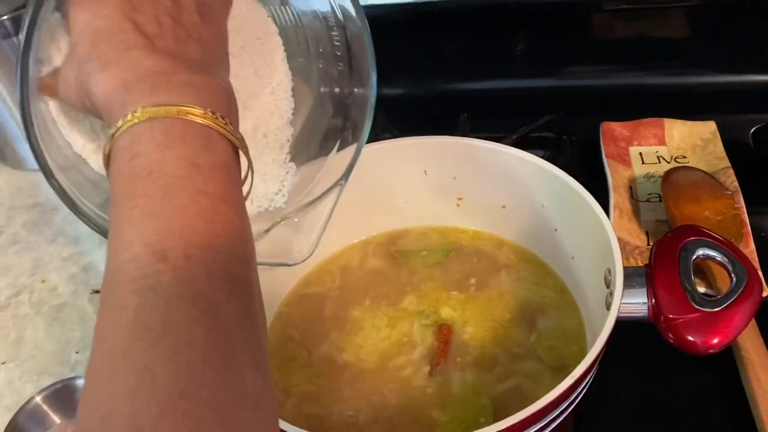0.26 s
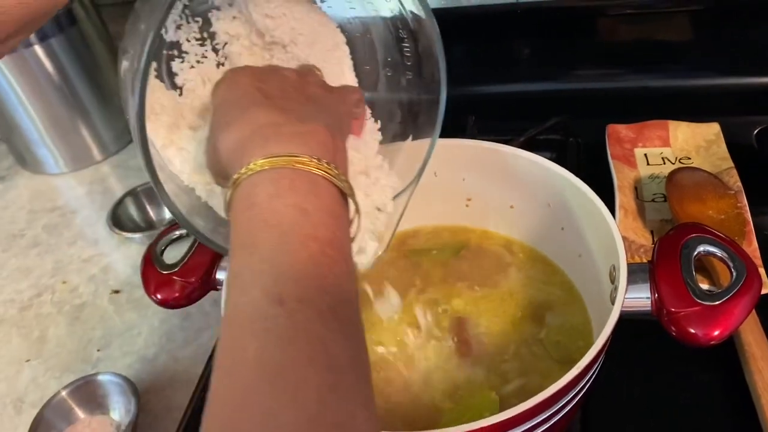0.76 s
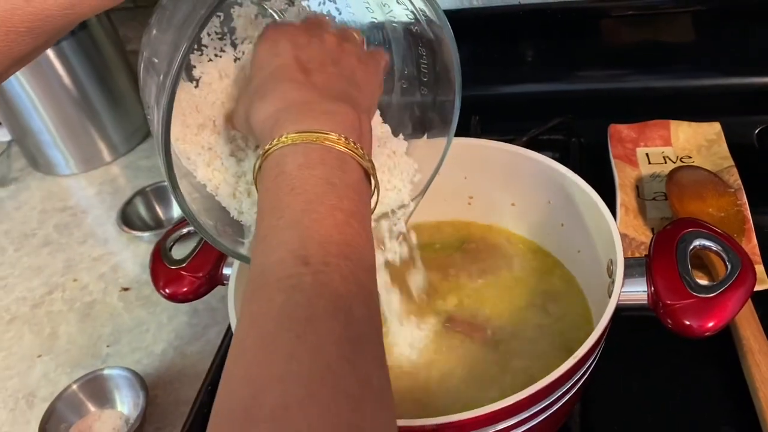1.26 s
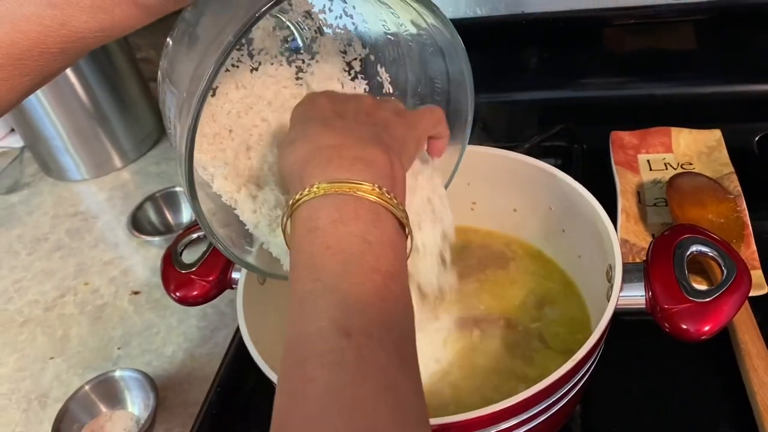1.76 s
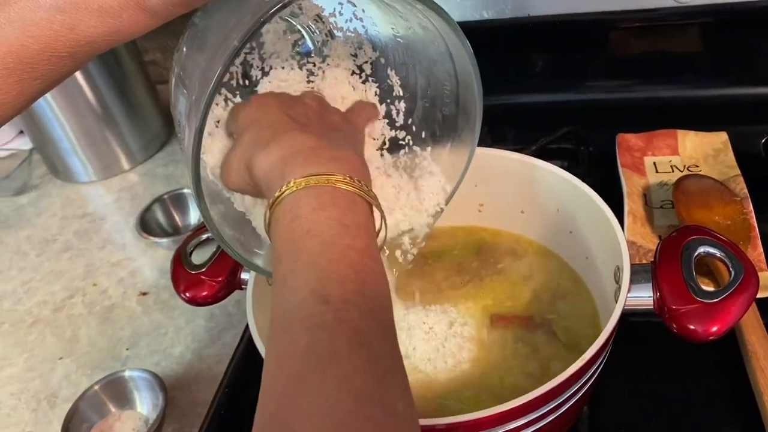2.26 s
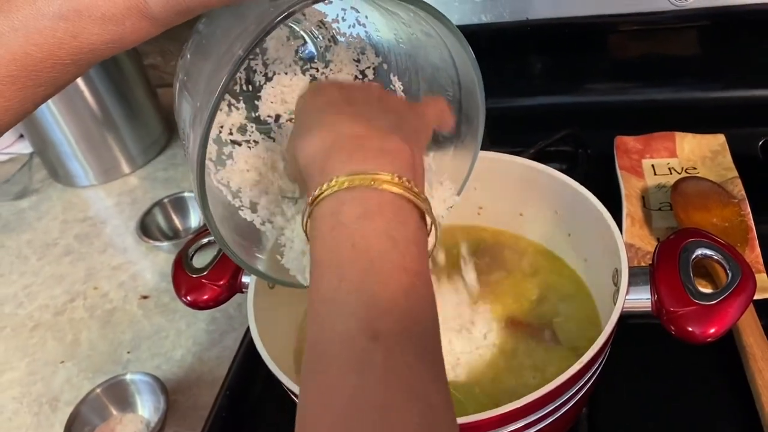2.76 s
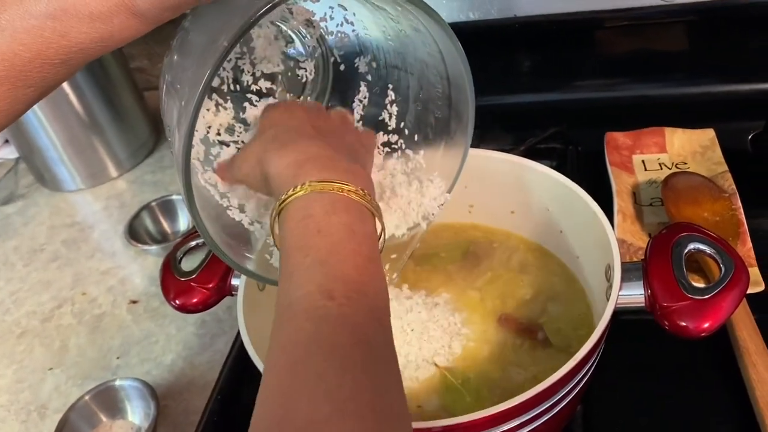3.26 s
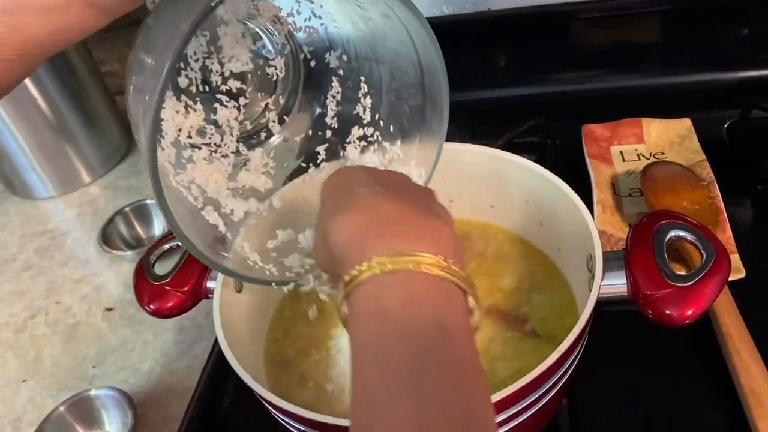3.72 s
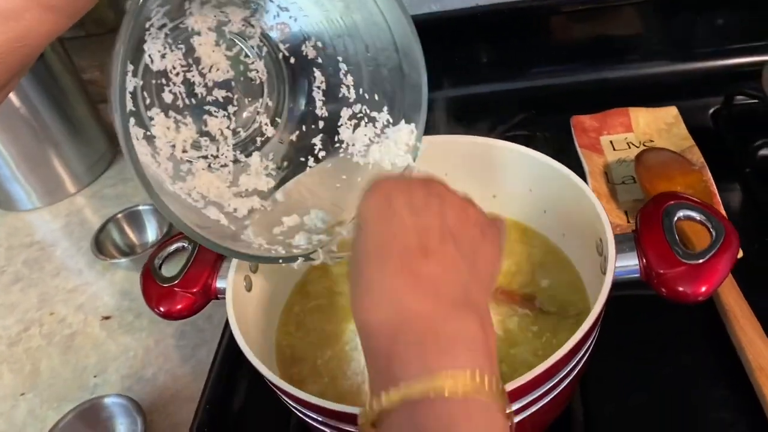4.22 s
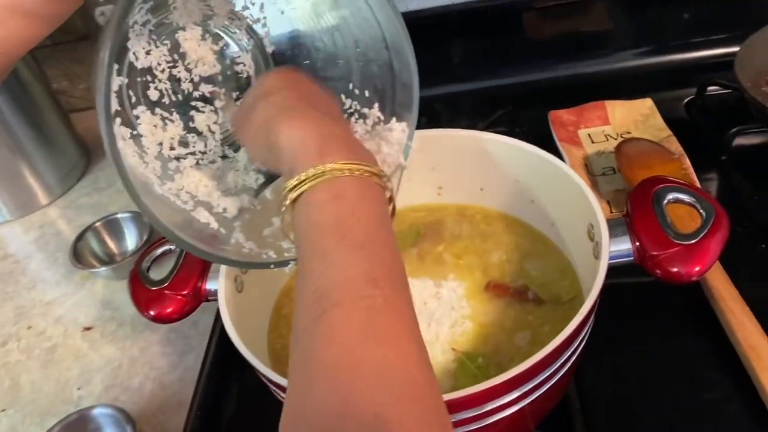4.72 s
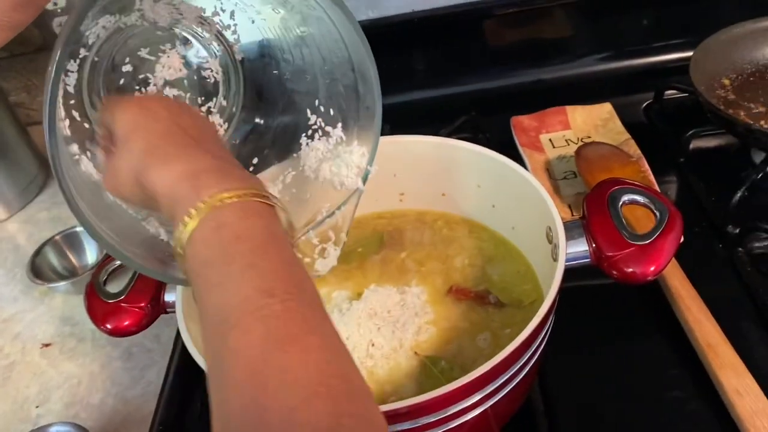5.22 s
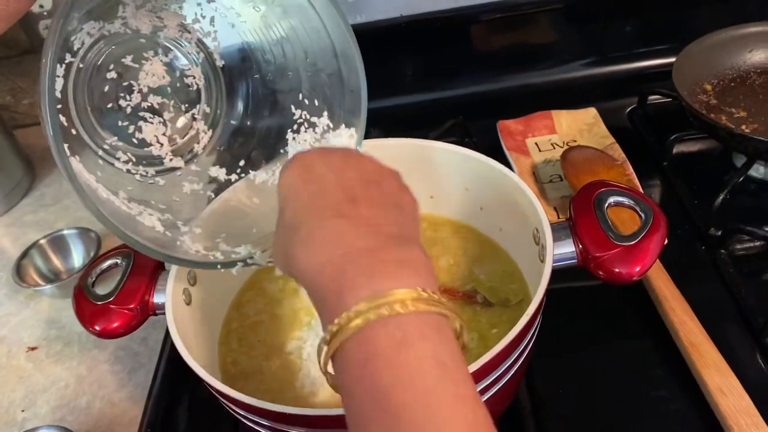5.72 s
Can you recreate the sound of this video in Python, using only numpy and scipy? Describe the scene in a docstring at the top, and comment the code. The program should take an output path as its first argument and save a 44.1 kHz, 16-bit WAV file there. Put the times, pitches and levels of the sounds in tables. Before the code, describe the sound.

Close-up stereo sound at a stove: a quiet low fan hum, a hollow ringing knock of bowl against pot at half a second, then bright, sizzling pours of wet grains into broth, strongest between one and two seconds, dotted with snapping bubbles. Later pushes are smaller and more separated, with finger rubs on glass and delicate bangles tinkling on a moving wrist toward the end.

```python
"""A kitchen stove: soaked rice is pushed by hand out of a glass bowl into a pot of simmering broth.
Wet grains crackle and splash in surges: showers of tiny ringing pops, with larger bursts and plinks.
The bowl knocks on the rim and rings the pot's modes; thin bangles jingle on the wrist in fading bounces.
A fan drones as coloured noise with wavering tones; a close pair of microphone ports picks it all up."""
import sys
import numpy as np
from scipy import signal
from scipy.fft import rfft, irfft, next_fast_len
from scipy.io import wavfile

SR = 44100
rng = np.random.default_rng(int(sys.argv[2]) if len(sys.argv) > 2 else 0)


def generate_wav(signal):
    """Clip the signal to [-1, 1] and save it as 16-bit WAV at the path in sys.argv[1]."""
    frames = np.transpose(np.atleast_2d(signal))
    scaled = np.clip(frames, -1, 1) * 32767
    pcm = np.round(scaled).astype(np.int16)
    wavfile.write(sys.argv[1], SR, pcm)


N = 263894
TIME = np.arange(N) / SR
FFT_SIZE = next_fast_len(N, real=True)
BINS_HZ = np.arange(FFT_SIZE // 2 + 1) * SR / FFT_SIZE


def from_db(db):
    """Decibels to amplitude gain."""
    return 10 ** (np.asarray(db) / 20)


def rms_one(x):
    """Scale to rms 1."""
    return x / np.sqrt(np.mean(x ** 2) + 1e-20)


def coloured(x, spectrum):
    """Shape a flat sound with a spectrum interpolated over log frequency; rms 1."""
    hz, db = np.transpose(spectrum)
    gain = from_db(np.interp(np.log(BINS_HZ + 1), np.log(hz), db))
    return rms_one(irfft(rfft(x, FFT_SIZE) * gain, FFT_SIZE)[..., :N])


def cut(x, hz, kind, order=2):
    """Butterworth low-pass or high-pass."""
    sos = signal.butter(order, min(hz, 0.45 * SR), kind, fs=SR, output="sos")
    return signal.sosfilt(sos, x + 1e-18)


def drift(rate_hz):
    """Random curve of rms 1 that reaches a new value rate_hz times a second."""
    knots = rng.standard_normal(2000)
    return rms_one(np.interp(TIME * rate_hz, np.arange(len(knots)), knots))


def swell(rise_s, size):
    """Envelope that climbs to 1 at rise_s and fades."""
    age = TIME[:size] / rise_s
    return age ** 2 * np.exp(2 * (1 - age))


def burst(t60_s, size=6000):
    """Noise that dies away by 60 dB in t60_s."""
    return rng.standard_normal(size) * from_db(-60 * TIME[:size] / t60_s)


def ring(clicks, hz, t60_s):
    """Two-pole resonator: a unit click starts a decaying sine of height 1."""
    radius = from_db(-60 / (t60_s * SR))
    angle = 2 * np.pi * hz / SR
    return signal.lfilter([0, np.sin(angle)], [1, -2 * radius * np.cos(angle), radius ** 2], clicks + 1e-18)


def add(track, start_s, sound):
    """Mix a short sound into the track."""
    start = min(round(start_s * SR), N)
    track[start:start + len(sound)] += sound[:N - start]


def grains(per_s, spread_db, low_hz, high_hz, cycles, patchy_db=0, count=20):
    """Random tiny pops ring a few cycles at one of many pitches, clustered per pitch; flat per Hz."""
    born = np.flatnonzero(rng.random(N) < per_s / SR)
    size_db = spread_db * np.minimum(rng.exponential(1, len(born)), 5)
    sizes = from_db(size_db) * rng.choice([-1, 1], len(born))
    pitch_index = rng.integers(0, count, len(born))
    out = np.zeros(N)
    for k, hz in enumerate(np.geomspace(low_hz, high_hz, count)):
        chosen = pitch_index == k
        at = born[chosen]
        cluster = rng.standard_normal(N // 600 + 1)  # one value per 600 samples
        clicks = np.zeros(N)
        clicks[at] = sizes[chosen] * from_db(patchy_db * cluster[at // 600])
        pops = np.diff(ring(clicks, hz, cycles / hz), prepend=0)
        out += np.sqrt(hz) * rms_one(pops)
    return out


SURGE_DB = 21.5  # climb over the rise, and equal fall over the fall
SPRAY_FOLLOWS, SPLASH_FOLLOWS = 0.98, 0.67  # dB of spray and of splash per dB of surge
TRICKLE_DB, SIMMER_DB = -84.5, -79.5  # floors: stray grains, simmering broth
# Pushes of the hand. Each row: crest in seconds, crackle in dB before the mix, rise in seconds, fall in
# seconds, fine spray in dB over the crackle, splash in dB over the crackle.
PUSHES = [(0.29, -62.5, 0.63, 1, 4, -3), (0.644, -51.5, 0.054, 0.063, 9.5, -1),
          (0.998, -48, 0.19, 0.67, 0, -10), (1.657, -46, 0.23, 0.64, -2, -13),
          (2.06, -57, 0.23, 0.46, -23, -11), (2.572, -51, 0.35, 0.35, 3, -8.5),
          (2.842, -55, 0.78, 0.07, -4, -29), (3.081, -64.5, 0.2, 0.47, 0, -11.5),
          (3.6, -53, 0.33, 0.25, 1.5, -6), (4.11, -55, 0.034, 0.14, 5, 0.5),
          (4.508, -64, 0.17, 0.5, 2.5, 4), (5.0, -72, 0.374, 1, 6.5, -11.5),
          (5.618, -58.5, 0.19, 0.11, 8.5, -10)]


def surges():
    """Each push swells to a crest and drains away; powers add to give crackle, spray and splash in dB."""
    crackle, spray, splash = from_db([TRICKLE_DB, TRICKLE_DB, SIMMER_DB]) ** 2
    for crest_s, db, rise_s, fall_s, spray_db, splash_db in PUSHES:
        distance = np.maximum((crest_s - TIME) / rise_s, (TIME - crest_s) / fall_s)
        shape_db = -SURGE_DB * distance.clip(0, 8)
        crackle = crackle + from_db(db + shape_db) ** 2
        spray = spray + from_db(db + spray_db + SPRAY_FOLLOWS * shape_db) ** 2
        splash = splash + from_db(db + splash_db + SPLASH_FOLLOWS * shape_db) ** 2
    return 10 * np.log10([crackle, spray, splash])


# Crackle spectrum. Each row: frequency in Hz, relative level in dB per Hz.
CRACKLE_SPECTRUM = [(900, -22), (1800, -21), (2400, -7), (2850, -14), (3250, -11), (4200, -1.5),
                    (5200, 1.5), (6300, -2), (7800, -0.5), (11000, 1.5), (16000, 1.5)]


def rice(crackle_db, spray_db):
    """Wet grains part and land: stronger flow, denser crackle and denser squelch of tiny air pockets."""
    flow = 0.25 + 0.75 * from_db(0.5 * (crackle_db - crackle_db.max()))
    ticks = grains(12000 * flow, spread_db=3.2, low_hz=1390, high_hz=14800, cycles=6.0, patchy_db=2.5)
    pockets = grains(2000 * flow, spread_db=3.3, low_hz=2050, high_hz=8000, cycles=14.0, patchy_db=4.0)
    crackle = coloured(ticks, CRACKLE_SPECTRUM)
    squelch = from_db(-3) * rms_one(pockets)
    coarse = (cut(crackle, 10330, "low", order=4) + squelch) * from_db(crackle_db)
    fine = cut(crackle, 7770, "high", order=4) * from_db(spray_db)
    even = np.sqrt(flow.mean() / flow)  # density alone does not raise the level
    flicker = from_db(0.9 * drift(23) + 0.8 * drift(270))
    return (coarse + fine) * even * flicker


# Fingers sweep rice off the glass and clumps slap down. Each row: start in seconds, rms before the
# envelope and mix in dB, length in seconds, lowest Hz, highest Hz.
CLUMPS = [(0.171, -63, 0.088, 1100, 3900), (1.06, -49, 0.043, 9000, 16000), (1.794, -46, 0.042, 885, 7000),
          (2.03, -50, 0.055, 8900, 16000), (2.35, -61.5, 0.19, 900, 2800), (2.494, -53, 0.071, 2360, 6200),
          (2.59, -61, 0.025, 2400, 8500), (2.678, -54, 0.063, 2530, 6500), (2.805, -67, 0.039, 2520, 7600),
          (2.956, -57.5, 0.11, 4180, 15000), (3.054, -65, 0.05, 2500, 6500),
          (3.443, -54, 0.062, 3300, 6400), (3.56, -48, 0.031, 2050, 8660), (3.711, -56, 0.022, 4550, 8000),
          (3.753, -61, 0.1, 990, 3240), (4.107, -52, 0.019, 800, 9100), (4.503, -65, 0.041, 3000, 8000),
          (4.533, -56.5, 0.038, 2480, 5860), (4.549, -61.5, 0.065, 1320, 3200),
          (5.444, -64.5, 0.17, 4000, 7000), (5.598, -70, 0.062, 1980, 8150),
          (5.708, -57, 0.026, 5000, 12000)]


def clumps():
    """A clump is a short band-limited shower of coarse grains that swells quickly and fades."""
    shower = rms_one(grains(6000, spread_db=3.0, low_hz=695, high_hz=12000, cycles=4.0, patchy_db=3.0))
    out = np.zeros(N)
    for start_s, db, length_s, low_hz, high_hz in CLUMPS:
        shape = swell(length_s / 4, round(2 * length_s * SR))
        piece = np.roll(shower, -round(start_s * SR))[:len(shape)]
        piece = cut(piece, low_hz, "high", order=3)
        piece = cut(piece, high_hz, "low", order=3)
        add(out, start_s, from_db(db) * shape * rms_one(piece))
    return out


# Splash spectrum. Each row: frequency in Hz, relative level in dB per Hz.
SPLASH_SPECTRUM = [(300, 17.5), (600, -7), (1150, -7.5), (1700, -15.5), (2400, -18), (4000, -15)]


def broth(splash_db):
    """Sinking rice drags in small ringing bubbles, over a quiet simmer."""
    per_s = 450 * from_db(4.0 * drift(15))
    bubbles = grains(per_s, spread_db=3.0, low_hz=500, high_hz=3000, cycles=14.0, patchy_db=2.5)
    return coloured(bubbles, SPLASH_SPECTRUM) * from_db(splash_db)


SNAP_T60_S, SNAP_SHORTENS = 0.022, 0.15  # decay at 5 kHz; power of pitch that shortens it
SNAP_TOP_OVER_CENTRE = 2.5  # low-pass at this multiple of the centre
# Largest air pockets. Each row: start in seconds, peak (99.9th percentile) in dB, centre Hz, lowest Hz.
SNAPS = [(0.6112, -39, 11100, 6000), (0.647, -39, 8000, 2200), (0.7362, -41.5, 4200, 2200),
         (0.9216, -31, 11300, 5000), (0.9648, -29.5, 12100, 4000), (0.9817, -27.5, 8000, 2200),
         (1.3378, -38, 8000, 4000), (1.441, -29.5, 8000, 3400), (1.4771, -46, 12000, 8000),
         (1.539, -38, 12000, 8000), (1.5609, -38, 7000, 3200), (1.5859, -36.5, 11500, 8000),
         (1.641, -31, 7000, 2800), (1.7804, -25, 5500, 3600), (1.8334, -26.5, 7340, 2800),
         (2.1107, -37, 3600, 2900), (2.1541, -42, 10500, 7500), (2.189, -49, 12000, 8000),
         (2.3177, -48, 11500, 8000), (2.3499, -40, 6500, 4000), (2.5328, -33, 5040, 3200),
         (3.0431, -49, 7500, 3000), (3.1448, -50, 7500, 4000), (3.3434, -51, 8000, 5000),
         (4.2415, -48, 7000, 4000), (4.4235, -40, 12400, 9000), (5.104, -49, 12000, 8000)]


def snaps():
    """The largest air pockets burst: a sharp tick and a short noise spray round one pitch."""
    out = np.zeros(N)
    for start_s, db, hz, low_hz in SNAPS:
        t60_s = SNAP_T60_S * (5000 / hz) ** SNAP_SHORTENS
        spray = burst(t60_s) + 1.1 * burst(t60_s=0.004)
        spray = cut(spray, low_hz, "high", order=4)
        spray = cut(spray, SNAP_TOP_OVER_CENTRE * hz, "low", order=3)
        snap = rms_one(spray) + 0.6 * rms_one(ring(spray, hz, 7 / hz))
        add(out, start_s, from_db(db) * snap / np.percentile(np.abs(snap), 99.9))
    return out


SPIT_OVER_FLOW_DB, SPIT_SPREAD_DB = 8, 3  # small plinks: peak over the crackle level, plus or minus
PLINK_RISE_S, PLINK_CYCLES = 0.0025, 11  # opening time; cycles per 60 dB in each of two resonators
# Larger single bubbles. Each row: start in seconds, peak in dB, pitch in Hz.
PLINKS = [(1.7, -35, 5100), (1.8673, -37, 5270), (1.982, -39.5, 5460), (2.0329, -47, 3000),
          (2.1676, -42, 4470), (2.2185, -44.5, 5700), (2.2434, -44.5, 6460), (2.551, -38, 2630),
          (2.6834, -62, 2760), (2.8087, -44.5, 4500), (3.4058, -49.5, 6960), (4.8466, -45.5, 7960),
          (5.112, -55.5, 3670), (5.684, -56.5, 4370)]


def plinks(crackle_db, count=24):
    """Bubbles part in the wet rice and ring at one pitch; small ones fall at random, mostly in strong flow."""
    passed = np.cumsum(from_db(crackle_db) ** 2)
    starts = np.searchsorted(passed, rng.random(count) * passed[-1])
    spit_db = crackle_db[starts] + SPIT_OVER_FLOW_DB + SPIT_SPREAD_DB * rng.uniform(-1, 1, count)
    spits = list(zip(starts / SR, spit_db, rng.uniform(3300, 8000, count)))
    out = np.zeros(N)
    for start_s, db, hz in spits + list(PLINKS):
        plink = swell(PLINK_RISE_S, size=2000) * rng.standard_normal(2000)
        for _ in range(2):
            plink = ring(plink, hz, PLINK_CYCLES / hz)
        add(out, start_s, from_db(db) * plink / np.abs(plink).max())
    return out


SWIPE_WIDTH_HZ, SWIPE_JERK_DB = 260, 4  # low-pass of the resonance noise; stick-slip level spread
# Wet finger drags on the glass. Each row: start in seconds, rms before the envelope and mix in dB,
# length in seconds, first Hz, last Hz.
SWIPES = [(4.535, -66, 0.07, 3000, 1100), (5.48, -66, 0.075, 4000, 5000), (5.59, -62, 0.05, 4100, 5600)]


def swipes():
    """The finger's jerky rubbing sounds in a narrow resonance that glides as the gap under it changes."""
    out = np.zeros(N)
    for start_s, db, length_s, first_hz, last_hz in SWIPES:
        size = round(2 * length_s * SR)
        phase = 2 * np.pi * np.cumsum(np.geomspace(first_hz, last_hz, size)) / SR
        a, b = cut(rng.standard_normal((2, SR)), SWIPE_WIDTH_HZ, "low")[:, :size]
        jerk = from_db(SWIPE_JERK_DB * drift(110)[:size])
        rub = (a * np.cos(phase) + b * np.sin(phase)) * jerk
        add(out, start_s, from_db(db) * swell(length_s / 2, size) * rms_one(rub))
    return out


CONTACT_RISE_S = 0.002
# Bowl meets rim. Each row: start in seconds, contact peak in dB, contact pitch in Hz, crack drive in dB
# over the peak before its filters, stove-top thud drive in dB over the peak.
KNOCKS = [(0.4685, -9.5, 1130, -16, 1.5), (0.509, -40, 1250, 5, -12), (0.5595, -21.5, 1100, -22, 6),
          (1.444, -44, 1380, -26, 1), (1.468, -40.5, 1330, -14, 2), (1.486, -48, 1340, -16, -10),
          (1.517, -36.5, 1250, -13, 6.5)]
# Bowl, pot and stove top together. Each row: mode in Hz, level in dB per unit blow, t60 in seconds.
POT_MODES = [(60, -27, 0.45), (98, -21, 0.16), (128, -24, 0.2), (166, -14, 0.15), (330, -21, 0.09),
             (372, -19, 0.15), (466, -19, 0.12), (507, -19, 0.13), (528, -21, 0.22), (610, -22, 0.07),
             (693, -26, 0.22), (724, -28.5, 0.22), (846, -31, 0.16), (1045, -14, 0.085), (1141, -18, 0.165),
             (1273, -21, 0.2), (1418, -28, 0.12), (1484, -30, 0.2), (1570, -22, 0.05), (1635, -26, 0.13),
             (1768, -32, 0.13), (1900, -27, 0.045), (2180, -29, 0.05), (2285, -33, 0.13), (2345, -31, 0.08),
             (2835, -31, 0.09), (2905, -33, 0.13), (3920, -30, 0.03), (4900, -32, 0.03)]


def knocks():
    """Glass on the rim: contact tone, short crack, ringing modes, faint chatter of the pot on the stove top."""
    blows, contacts, cracks, chatter, thuds = np.zeros((5, N))
    contact = swell(CONTACT_RISE_S, size=1000)
    for start_s, db, hz, crack_db, thud_db in KNOCKS:
        add(contacts, start_s, from_db(db) * contact * np.sin(2 * np.pi * hz * TIME[:len(contact)]))
        add(blows, start_s, from_db([db]))
        add(cracks, start_s, from_db(db + crack_db) * burst(t60_s=0.1))
        add(chatter, start_s, from_db(db) * burst(t60_s=0.13))
        add(thuds, start_s + 0.01175, from_db([db + thud_db]))  # heavy stove top answers after the rim
    body = np.zeros(N)
    for k, (hz, db, t60_s) in enumerate(POT_MODES):
        drive = thuds if hz < 250 else blows
        body += (-1) ** k * from_db(db) * ring(drive, hz, t60_s)
    crack = cut(cut(cracks, 1150, "high"), 4140, "low", order=1)
    rattle = from_db(-6) * cut(cut(chatter, 230, "high"), 620, "low", order=1)
    return contacts + body + crack + rattle


BUMP_CYCLES = 2.8  # cycles until loudest
# Pot rocks back onto the stove top. Each row: start in seconds, peak in dB, pitch in Hz.
BUMPS = [(0.556, -34.5, 500), (0.617, -43, 60.5)]


def bumps():
    """The pot settles: each soft landing hums briefly at one pitch."""
    out = np.zeros(N)
    for start_s, db, hz in BUMPS:
        push = swell(BUMP_CYCLES / hz, size=8000)
        add(out, start_s, from_db(db) * push * np.sin(2 * np.pi * hz * TIME[:len(push)]))
    return out


BOUNCE_S, BOUNCE_LOSS_DB = 0.008, 2.6  # mean gap; loss per bounce
BANGLE_DETUNE, BANGLE_DAMPING = 0.007, 0.7  # pitch difference; share of free t60 left in contact
LOW_RINGS_BELOW_HZ = 9500
# Touches, ringing less against the skin. Each row: start in seconds, contact noise gain in dB,
# high rings in dB, low rings in dB, both before the mode level and a common -7.5 dB.
JINGLES = [(3.999, -51, -67, -75), (4.108, -37, -62, -52.5), (4.2644, -54, -64, -78),
           (4.469, -48, -67, -53.5), (4.889, -57, -66, -66), (4.929, -59, -74, -70),
           (4.978, -57.5, -77, -66.5), (5.225, -50.5, -56, -70.5), (5.549, -47.5, -48, -71),
           (5.591, -50, -59, -58), (5.808, -59, -88, -74), (5.857, -58, -49, -74),
           (5.862, -53.5, -49.5, -71), (5.896, -56, -61, -74), (5.968, -57, -56.5, -76)]
# Bangle rings. Each row: frequency in Hz, relative level in dB, free t60 in seconds.
BANGLE_MODES = [(5712, -8, 0.16), (6072, -6, 0.17), (6570, -8, 0.17), (6875, -7, 0.16), (7127, -2, 0.22),
                (8576, 0, 0.07), (10520, -5, 0.12), (10960, -9, 0.14), (11370, -2, 0.09), (11490, 2, 0.16),
                (12060, -9, 0.12), (14770, -10, 0.1), (15030, -7, 0.12), (15590, -7, 0.13)]


def bangles(count=7):
    """Each touch is a run of uneven, fading bounces that tick and strike every ring; two unlike bangles beat."""
    touches_s, contact_db, high_db, low_db = np.transpose(JINGLES)
    gaps_s = BOUNCE_S * rng.uniform(0.3, 1.7, (len(touches_s), count))
    times_s = touches_s[:, None] + np.cumsum(gaps_s, axis=1) - gaps_s[:, :1]
    at = np.minimum((times_s * SR).astype(int), N - 1)
    fading = from_db(-BOUNCE_LOSS_DB * np.arange(count))
    out = np.zeros(N)
    for hz, db, t60_s in BANGLE_MODES:
        ring_db = low_db if hz < LOW_RINGS_BELOW_HZ else high_db
        for detune in (1 - BANGLE_DETUNE / 2, 1 + BANGLE_DETUNE / 2):
            luck_db = rng.normal(0, 3.5, at.shape)
            clicks = np.zeros(N)
            clicks[at] = fading * from_db(ring_db[:, None] + db + luck_db - 7.5)
            out += ring(clicks, hz * detune, BANGLE_DAMPING * t60_s)
    contact_gains = fading * from_db(contact_db[:, None])
    for start_s, gain in zip(times_s.ravel(), contact_gains.ravel()):
        tick = 1.05 * burst(t60_s=0.036) + 1.6 * burst(t60_s=0.006)
        add(out, start_s, gain * cut(tick, 8800, "high"))
    return out


def narrow_noise(hz, width_hz):
    """Resonance-shaped spectrum of a wavering tone, with the power of white noise."""
    return rms_one(1 / (1 + (2 * (BINS_HZ - hz) / width_hz) ** 2))


# Rush of the fan. Each row: frequency in Hz, relative level in dB per Hz.
FAN_SPECTRUM = [(15, -42), (25, -36), (43, -10), (76, -9), (128, -13), (164, -1.5), (202, -19.5),
                (264, -8.5), (434, -20), (471, -9.5), (501, -17), (932, -24.5), (1010, -25.5),
                (2310, -42.5), (3500, -47), (4550, -43), (7700, -120)]
# Motor and duct tones. Each row: frequency in Hz, width in Hz, level in dB before a common +4 dB.
FAN_TONES = [(61.8, 4.8, -70), (90.1, 3.7, -63), (116.4, 1.7, -66.5), (163.3, 28.4, -56), (267.1, 4.1, -66),
             (348, 92, -61), (2800, 200, -84.5)]
# Passing swells of the hum. Each row: crest in seconds, length in seconds, frequency in Hz,
# peak in dB before the same +4 dB.
HUM_SWELLS = [(2.75, 0.65, 274.5, -56.5), (4.98, 1.94, 478.4, -62.5)]


def fan():
    """A steady rush, independent noise on each side, with wavering motor and duct tones in it."""
    rush = from_db(-50.5) * coloured(rng.standard_normal((2, N)), FAN_SPECTRUM)
    lines = sum(from_db(db) * narrow_noise(hz, width_hz) for hz, width_hz, db in FAN_TONES)
    tones = irfft(lines * rfft(rng.standard_normal((2, FFT_SIZE))), FFT_SIZE)[:, :N]
    for crest_s, length_s, hz, db in HUM_SWELLS:
        shape = np.exp(-(2 * (TIME - crest_s) / length_s) ** 2)
        tones = tones + from_db(db) * shape * np.sin(2 * np.pi * hz * TIME + drift(12))
    return rush + from_db(4.0) * tones


def kitchen(x, t60_s, treble_t60_s, size=22000):
    """Dense reflections as decaying noise, different on each side; the treble dies sooner."""
    onset = 1 - np.exp(-TIME[:size] / 0.0006)
    sides = []
    for _ in range(2):
        low = cut(burst(t60_s, size), 3270, "low", order=1)
        treble = cut(burst(treble_t60_s, size), 1900, "high", order=1)
        response = rms_one(onset * (low + treble)) / np.sqrt(size)
        sides.append(signal.fftconvolve(x, response)[:N])
    return np.array(sides)


def turned(pair, lead_rad, spread):
    """Scale the side signal and let the left lead in phase, per frequency."""
    left, right = rfft(pair, FFT_SIZE)
    mid, side = (left + right) / 2, spread * (left - right) / 2
    return irfft(np.array([(mid + side) * np.exp(1j * lead_rad), mid - side]), FFT_SIZE)[:, :N]


def placed(pair, image):
    """Give a sound its width and direction at the ports."""
    hz, lead_rad, spread = np.transpose(image)
    return turned(pair, np.interp(BINS_HZ, hz, lead_rad), np.interp(BINS_HZ, hz, spread))


# Pot and bowl at the ports. Each row: frequency in Hz, left lead in radians, gain of the stereo spread.
POT_IMAGE = [(151, 0, 0.463), (300, -0.1, 0.99), (500, 0.5, 1.6), (1100, 0.7, 1.23), (2400, 0.6, 0.62),
             (5000, 1, 0.83), (7000, -0.34, 1.09)]
# Fan, off to the right. Each row: frequency in Hz, left lead in radians, gain of the stereo spread.
FAN_IMAGE = [(160, -0.1, 0.15), (250, -0.5, 0.34), (350, -1.3, 0.45), (500, -1.2, 0.7), (780, -1.9, 0.7),
             (1100, -1.3, 0.8), (2000, 0, 1)]


def scene():
    """Everything at the pot is close and partly reflected; the fan fills the room."""
    crackle_db, spray_db, splash_db = surges()
    wet_sounds = rice(crackle_db, spray_db) + clumps() + swipes() + broth(splash_db)
    blows = knocks() + bumps()
    ticks = snaps() + plinks(crackle_db) + bangles()
    sent = from_db(-1.5) * wet_sounds + from_db(-11.5) * blows + from_db(-5) * ticks
    direct = from_db(-1.06) * wet_sounds + blows + ticks
    pot = direct + kitchen(sent, t60_s=0.33, treble_t60_s=0.1)
    return placed(pot, POT_IMAGE) + placed(fan(), FAN_IMAGE)


FLIP_FROM_HZ, FLIP_EVERY_HZ = 7000, 2075  # treble swaps between in phase and opposed
LOCKED_SPREAD = 0.08  # share of spread left where exactly in phase or opposed
CUTOFF_HZ = 15900


def record(dry):
    """In the treble the port pair turns the phase between sides in half turns; rumble and top are cut."""
    turn_rad = np.pi * np.maximum(BINS_HZ - FLIP_FROM_HZ, 0) / FLIP_EVERY_HZ
    lead_rad = np.sin(2 * turn_rad) / 2 - turn_rad  # lingers at each half turn
    spread = np.where(turn_rad > 0, LOCKED_SPREAD + (1 - LOCKED_SPREAD) * np.sin(turn_rad) ** 2, 1)
    pair = cut(turned(dry, lead_rad, spread), 36, "high", order=3)
    return signal.sosfilt(signal.ellip(12, 0.1, 80, CUTOFF_HZ, fs=SR, output="sos"), pair)


dry = scene()
out = record(dry)
generate_wav(out)
```